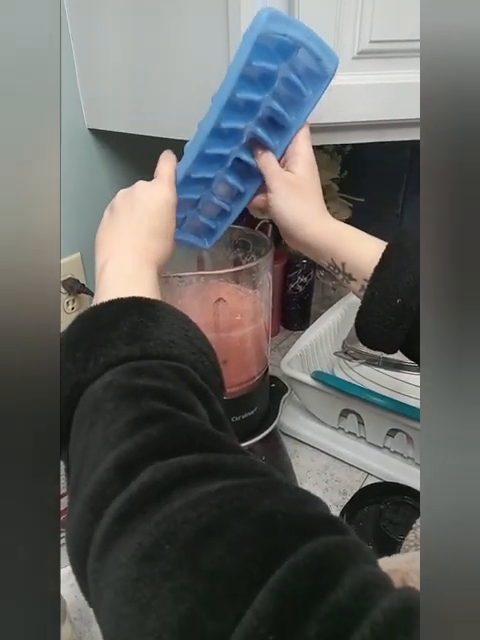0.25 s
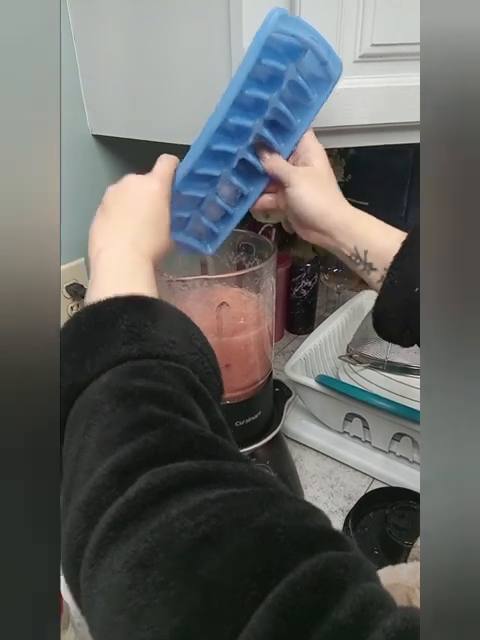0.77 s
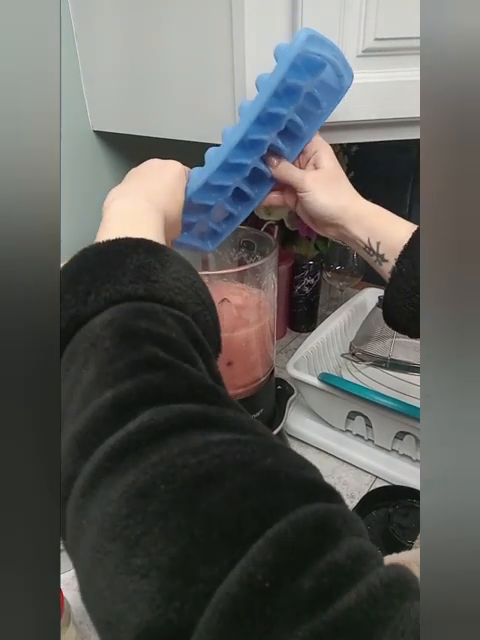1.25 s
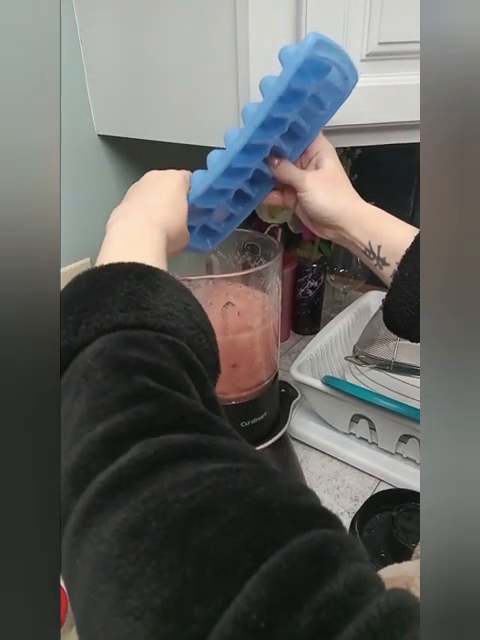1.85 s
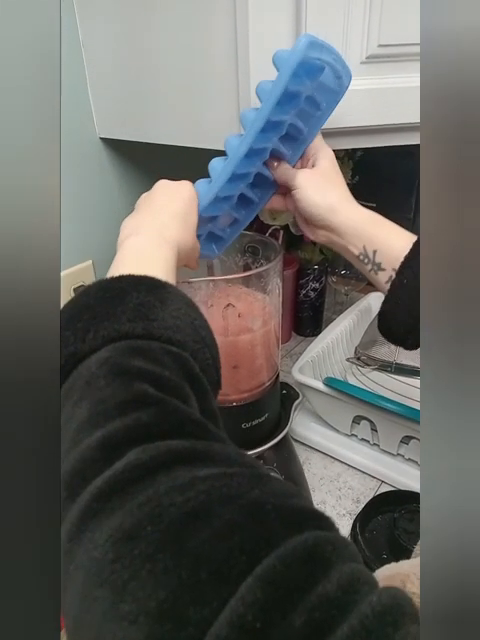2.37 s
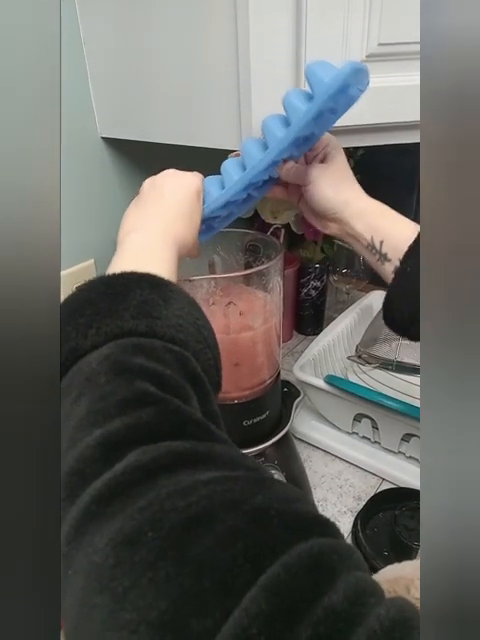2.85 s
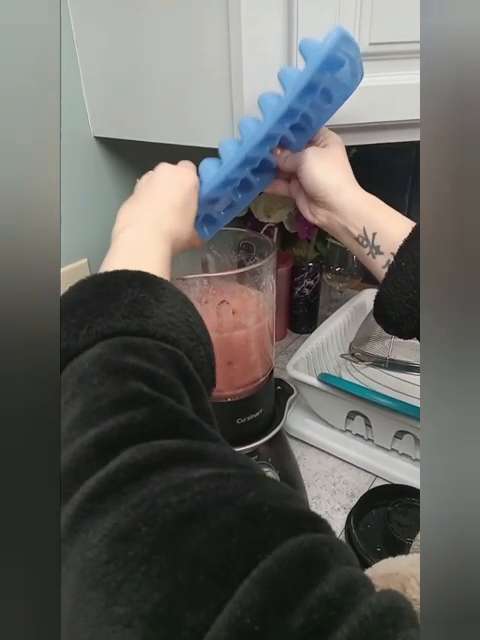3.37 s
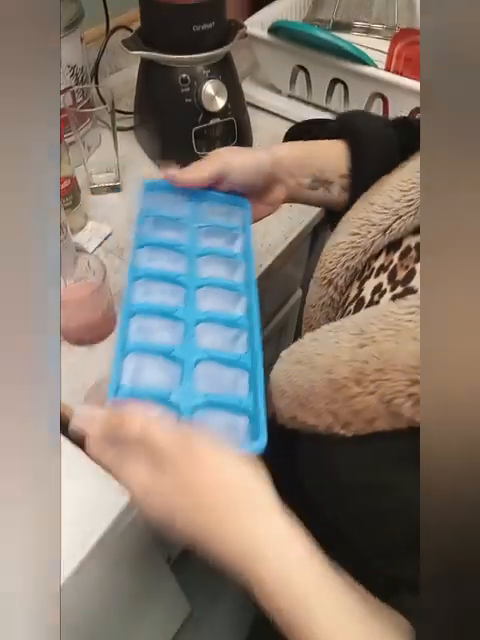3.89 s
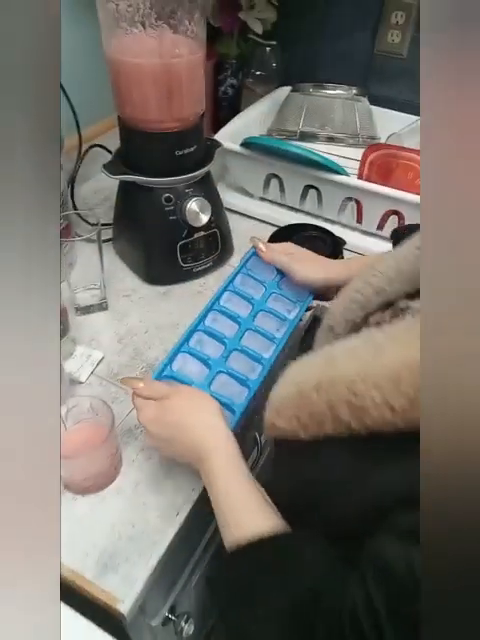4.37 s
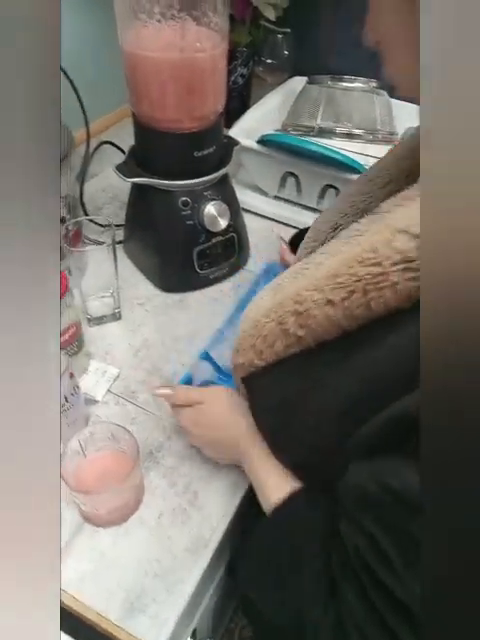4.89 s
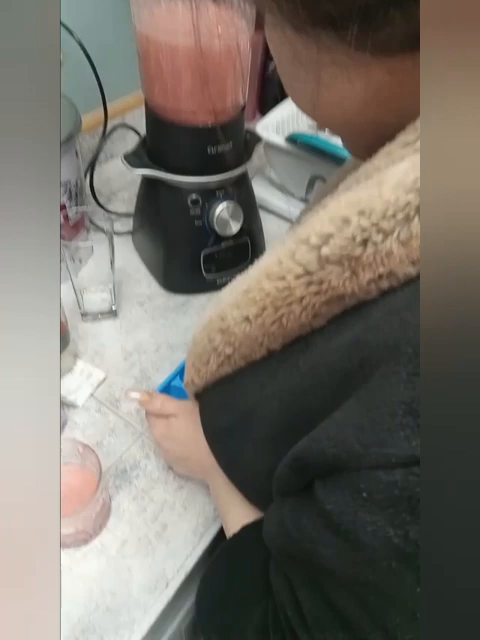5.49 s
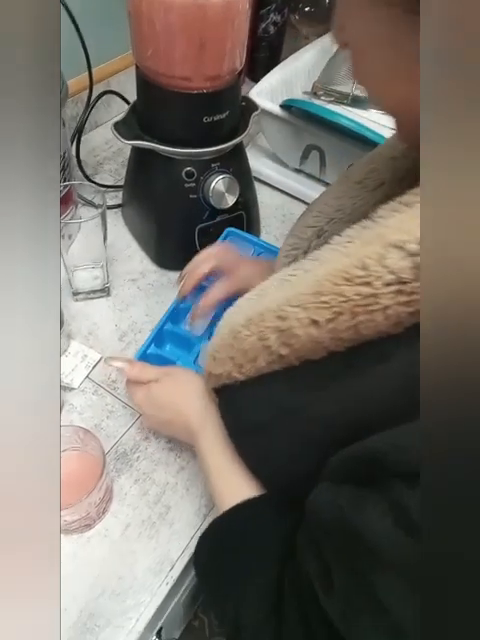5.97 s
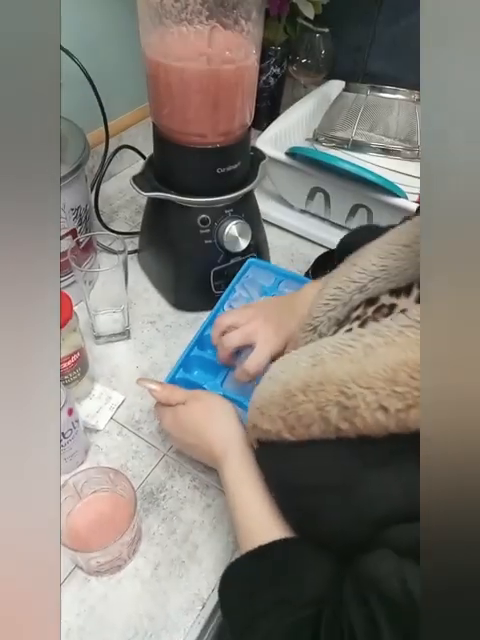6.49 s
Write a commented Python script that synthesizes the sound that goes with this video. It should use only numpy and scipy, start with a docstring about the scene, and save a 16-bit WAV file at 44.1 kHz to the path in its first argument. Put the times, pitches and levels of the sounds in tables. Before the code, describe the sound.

Ice cracks and crackles sharply as a plastic cube tray is twisted close up in a small kitchen, with one brief dead silence midway.

```python
"""In a small hard kitchen a plastic ice cube tray is bent and twisted, heard close up by two ports, the second facing away.
Ice snaps loose in short cracks (noise bursts through the tray plus ringing cups) and in runs of crackle
(dense grains of noise, with splinters that ping). Hands bump the tray as low decaying tones and fingers rub it
as a gliding narrow hiss; steady appliance noise and thin hums lie under all.
The sound stops dead for a moment before the tray is laid on the counter."""
import sys
import numpy as np
from scipy import signal
from scipy.io import wavfile
from scipy.ndimage import uniform_filter1d, minimum_filter1d

SR = 44100
rng = np.random.default_rng(int(sys.argv[2]) if len(sys.argv) > 2 else 0)


def int16_out(signal):
    """Quantize to a 16-bit WAV file."""
    q = np.round(np.clip(np.atleast_2d(signal).T, -1, 1) * 32767)
    wavfile.write(sys.argv[1], SR, q.astype(np.int16))


N = 297278  # length in samples

PAUSE = (3.718, 4.094)  # start and end of the silence, s
LAID_S = 4.62  # the tray comes to rest on the counter and takes its second colour


def amp(db):
    """Turn decibels into an amplitude factor."""
    return 10 ** (np.asarray(db) / 20)


def read(points, hz):
    """Read a curve of (Hz, value) points at the given frequencies, straight over log frequency."""
    f, value = np.transpose(points)
    return np.interp(np.log(hz + 1), np.log(f + 1), value)


def add(mix, s, sound):
    """Lay a sound into the mix at s seconds, cut at the end of the mix."""
    part = mix[..., round(s * SR):][..., :sound.shape[-1]]
    part += sound[..., :part.shape[-1]]


def air():
    """Steady appliance noise, its spectrum drifting in patches, with thin hums that waver in pitch."""
    # Kitchen floor as two curves, before and after the pause. Each row: frequency in Hz, relative level in dB.
    floor_curves = ([(18, -42), (30, -17), (245, -5), (900, -17), (1330, -18), (1500, -10), (1820, -12),
                     (2360, -7), (3380, -25.5), (4190, -19.5), (7440, -21.5), (9000, -47.5),
                     (11700, -70.5)], [(18, -52), (30, -23.5), (239, -9), (932, -18.5), (1160, -10),
                     (1500, -13), (1780, -11), (2250, -12), (2600, -9), (3230, -22.5), (6600, -16.5),
                     (9000, -52), (11700, -79), (19800, -120)])
    # Thin hums. Each row: start in seconds, end in seconds, centre pitch in Hz, level in dB RMS before the output gain.
    hum_rows = [(0, 3.72, 1484, -67.5), (0, 4.2, 2410, -74.5), (4.09, 6.74, 1178, -63.5)]
    floor_db = -60.5, -56.5  # RMS before and after the pause, ahead of the output gain

    frames, hz, t = N // 256 + 5, np.fft.rfftfreq(1024, 1 / SR), np.arange(N) / SR
    out = np.zeros(N)
    for curve, db, on in zip(floor_curves, floor_db, (t < PAUSE[1], t >= PAUSE[1])):
        real, imag, patches = rng.standard_normal((frames, 513, 3)).T
        patches = uniform_filter1d(patches, 8, axis=0)  # over frequency
        patches = uniform_filter1d(patches, 12, axis=1)  # over time
        patch_db = 2.0 * patches / patches.std()
        z = (real + 1j * imag) * amp(read(curve, hz)[:, None] + patch_db)
        noise = signal.istft(z, nperseg=1024, noverlap=768)[1][:N]
        out += on * amp(db) * noise / noise.std()
    for start, end, hum_hz, db in hum_rows:
        wander_hz = 300 * uniform_filter1d(rng.standard_normal(N), 2000)
        cycles = np.cumsum(hum_hz + wander_hz) / SR
        on = (t > start) & (t < end)
        out += np.sqrt(2) * amp(db) * on * np.sin(2 * np.pi * cycles)
    return out


def rub():
    """Fingers rub the plastic: noise in one narrow resonance that sinks in pitch and fades."""
    # Each row: start in seconds, length in seconds, relative level in dB, first pitch in Hz, last pitch in Hz.
    rub_rows = [(0, 0.5, -45.5, 2560, 2247), (1.84, 0.1, -58, 1200, 910), (1.95, .51, -51, 2024, 1826),
                (2.9, 0.33, -47, 2465, 2364)]
    fade_db = 14.5  # lost by the end of a rub

    out = np.zeros(N)
    for s, length, db, from_hz, to_hz in rub_rows:
        u = np.arange(0, length, 1 / SR) / length
        glide = np.exp(2j * np.pi * np.cumsum(from_hz + (to_hz - from_hz) * u) / SR)
        noise = rng.standard_normal(len(u)) + 1j * rng.standard_normal(len(u))
        slow = signal.lfilter(*signal.butter(2, 150, fs=SR), noise)  # becomes 150 Hz either side of the pitch
        level = np.minimum(u / .1, 1) * amp(db - fade_db * u ** 2)
        add(out, max(s, 0), level * (glide * slow).real / slow.real.std())
    return out


def bumps():
    """Hands on tray and counter: soft low rings that decay, and one sharp tap as a short pressure pulse."""
    # Dull bumps. Each row: start in seconds, relative level in dB, pitch in Hz, time to fall 60 dB in seconds.
    bump_rows = [(0.031, -50, 404, 0.13), (1.136, -39, 243, 0.11), (1.148, -52, 81.5, 0.13),
                 (1.17, -38, 115, 0.067), (1.412, -31, 276, 0.25), (1.413, -35, 90, 0.1),
                 (1.47, -37, 268, 0.2), (1.6, -47, 257, 0.11), (1.852, -41.5, 95, 0.11),
                 (1.849, -46, 216, 0.12), (1.87, -42.5, 361, 0.25), (1.909, -41, 331, 0.22),
                 (2.042, -40.5, 235, 0.12), (2.28, -48, 243.5, 0.14), (4.272, -32, 130, 0.042),
                 (4.547, -35, 132, 0.084), (5.439, -28, 150, 0.029), (5.798, -51.5, 138.8, 0.12),
                 (6.27, -45, 245, 0.19)]
    tap_s, tap_db, tap_width_s = 4.271, -13.5, 0.00039  # tap on the body that holds the ports

    out, t = np.zeros(N), np.arange(9000) / SR
    for s, db, hz, t60 in bump_rows:
        level = amp(db - 60 * t / t60) * (1 - np.exp(-t / 0.0055))
        add(out, s, level * np.sin(2 * np.pi * hz * t))
    u = t / tap_width_s
    add(out, tap_s, -amp(tap_db) * u * (2 - u) * np.exp(-u) * 2)
    return signal.lfilter(*signal.butter(2, 60, "high", fs=SR), out)


def ring(t, hz, t60, chance):
    """A struck cup: two close modes that beat as they die."""
    second_hz = hz * (1 + 0.11 * (chance[0] - .5))
    pair = np.sin(2 * np.pi * hz * t) + 0.39 * np.sin(2 * np.pi * (second_hz * t + chance[1]))
    return amp(-60 * t / t60) * pair


def cracks():
    """Ice tears loose: each crack sends a wide noise burst into the tray and rings a cup at three pitches."""
    # Single cracks. Each row: start in seconds, relative level in dB, cup ring in Hz, knock in Hz, bright ring in Hz,
    # knock over level in dB, snap over level in dB, base time to fall 60 dB in seconds (clamped below).
    crack_rows = [(0.0503, -42.5, 2580, 479, 4150, -14.5, -35, 0.033),
                  (0.0992, -28, 1520, 1080, 6550, -17, 9.5, 0.021),
                  (0.2284, -24, 2520, 1023, 7630, -14, 5, 0.018),
                  (0.3237, -29, 3200, 662, 6420, -4, 7, 0.04),
                  (0.4479, -55, 2290, 1070, 6160, -26, 5, 0.043),
                  (0.6015, -43, 2780, 842, 6570, -33, 16, 0.038),
                  (0.6274, -50, 2770, 820, 6330, -27, 17, 0.033),
                  (0.6669, -37.5, 3520, 888, 6030, -29, 15.5, 0.027),
                  (0.9584, -23.5, 3100, 630, 6450, -24, 5, 0.034),
                  (1.0011, -18, 2160, 1010, 7430, -27, -2, 0.038),
                  (1.0335, -17.5, 2960, 630, 4370, -32.5, -3, 0.035),
                  (1.0994, -14, 2580, 1058, 4550, -16, -6, 0.028),
                  (1.1258, -19, 1630, 1050, 4650, -3.5, -2.5, 0.025),
                  (1.1403, -13.5, 2450, 970, 7230, -15.5, -6.5, 0.022),
                  (1.1724, -19, 2600, 746, 4570, -18, -6, 0.029),
                  (1.2411, -12, 2180, 913, 4430, -22, -4, 0.022),
                  (1.2984, -13.5, 2270, 843, 4650, -21.5, -10, 0.039),
                  (1.3523, -17.5, 3130, 580, 4170, -26, -8, 0.036),
                  (1.3957, -11, 3010, 692, 4720, -12.5, -24, 0.026),
                  (1.4232, -17, 2676, 900, 3860, -18.5, -29, 0.032),
                  (1.4755, -28, 2660, 774, 4440, -9.5, -16, 0.036),
                  (1.6053, -19.5, 2633, 733, 3880, -37, -27, 0.041),
                  (1.7095, -48, 1980, 664, 6400, -19, -9, 0.076),
                  (1.7264, -45.5, 3340, 767, 6300, -25, 16, 0.026),
                  (1.7414, -35.5, 2440, 1100, 6180, -41, 11, 0.041),
                  (1.7654, -35, 2190, 778, 6400, -38, 4.5, 0.034),
                  (1.8282, -18, 2330, 1090, 4080, -45, -1, 0.022),
                  (1.9614, -25.5, 1640, 622, 4930, -18, -43, 0.048),
                  (2.166, -46.5, 1600, 1090, 6100, -32, -2.5, 0.092),
                  (2.1904, -19.5, 2830, 646, 6600, -42, -1.5, 0.018),
                  (2.2368, -21.5, 2090, 640, 4200, -32.5, -14, 0.044),
                  (2.3984, -38, 1576, 890, 4350, -27, -14, 0.044),
                  (2.4663, -20.5, 2214, 633, 4030, -11, -46, 0.039),
                  (2.6234, -57, 1480, 540, 6390, -12, 5, 0.033),
                  (2.6773, -17.5, 2790, 1050, 4400, -58, -20.5, 0.016),
                  (2.7134, -43.5, 2350, 550, 6200, -12, 14.5, 0.017),
                  (2.7397, -21.5, 2570, 658, 6230, -12.5, -9, 0.036),
                  (2.7641, -20.5, 3050, 627, 6500, -28, -6.5, 0.036),
                  (2.8444, -24, 2200, 640, 4300, -30, -30, 0.024),
                  (2.8818, -17, 2300, 620, 6440, -32, -18, 0.027),
                  (2.8983, -12, 2740, 611, 4380, -45, -6.5, 0.022),
                  (3.0654, -14.5, 2522, 644, 6470, -36, -6, 0.033),
                  (3.3574, -54, 1480, 830, 5850, -23, 12.5, 0.036),
                  (3.3837, -27.5, 2850, 834, 3770, -49, -12.5, 0.04),
                  (3.4356, -25, 1670, 622, 6500, -15.5, -12, 0.031),
                  (3.5224, -16.5, 1777, 783, 4350, -38, -10.5, 0.041),
                  (3.5867, -14, 2710, 888, 6100, -34.5, -5.5, 0.029),
                  (3.6551, -18, 2363, 648, 5800, -26, -19, 0.036),
                  (3.71, -25, 2470, 1010, 7250, -32, 9, 0.021),
                  (4.0991, -46, 3394, 711, 5990, -14.5, -9.5, 0.037),
                  (4.1714, -39.5, 3150, 770, 4630, -19, -8, 0.067),
                  (4.2532, -41, 1740, 460, 4800, -15, -17, 0.033),
                  (4.2944, -29, 3440, 1090, 7170, -16, 0, 0.061),
                  (4.4174, -38, 2280, 993, 6960, -21, 1, 0.044),
                  (4.4404, -28.5, 2655, 960, 6970, -23.5, 7, 0.057),
                  (4.4862, -28, 1880, 826, 6460, -34, 10, 0.015),
                  (4.5324, -26.5, 1380, 1080, 7100, -14.5, 3.5, 0.038),
                  (4.6314, -22.5, 2380, 1030, 5700, -25, -3.5, 0.038),
                  (4.6654, -35.5, 3130, 899, 6030, -22, 9, 0.055),
                  (4.7097, -34, 3450, 452, 5930, -25, 7, 0.039),
                  (4.7364, -32, 2680, 990, 5660, -36, 6.5, 0.029),
                  (4.7541, -20.5, 3010, 630, 6380, -28, 2.5, 0.029),
                  (4.81, -6, 2110, 1090, 5800, -38, -10, 0.033),
                  (4.8514, -9.5, 1980, 792, 6380, -21, -5.5, 0.05),
                  (4.8723, -9, 1576, 600, 4810, -19.5, -25, 0.098),
                  (4.9187, -11, 2120, 1100, 4040, -21, -7, 0.03),
                  (4.9596, -12.5, 2970, 1110, 4100, -15, -17, 0.03),
                  (5.1153, -16.5, 2230, 733, 5200, -24, -11, 0.042),
                  (5.1734, -28.5, 2300, 910, 5520, -30, 7, 0.041),
                  (5.1971, -15.5, 3220, 1150, 5150, -21, 0, 0.021),
                  (5.2126, -13, 2080, 674, 5300, -29, -7, 0.025),
                  (5.2694, -23, 1620, 800, 5030, -19, -4, 0.036),
                  (5.2879, -12, 1860, 566, 4940, -15.5, -5, 0.052),
                  (5.3557, -9.5, 1730, 920, 5480, -23, -26, 0.026),
                  (5.3737, -8.5, 2104, 577, 4730, -19.5, -35, 0.035),
                  (5.3991, -19, 2300, 753, 5530, -16, -10, 0.033),
                  (5.4684, -23.5, 1930, 534, 5930, -9, 4.5, 0.036),
                  (5.5049, -19, 1610, 844, 5230, -8, -4, 0.028),
                  (5.5408, -18.5, 1810, 773, 5900, -5.5, -9, 0.037),
                  (5.5797, -16.5, 2265, 984, 5680, -21, -6.5, 0.046),
                  (5.6174, -25, 2230, 750, 4380, -17, 4.5, 0.032),
                  (5.6675, -16, 1310, 1120, 4200, -12, -26, 0.024),
                  (5.7674, -34, 2245, 848, 6220, -33, -7, 0.045),
                  (6.0536, -15.5, 2070, 1020, 4610, -28, -4.5, 0.032),
                  (6.0786, -13, 2710, 1070, 4170, -29, -5.5, 0.021),
                  (6.1064, -23.5, 2940, 1050, 4720, -32, 8, 0.043),
                  (6.1534, -16, 2860, 1055, 4550, -16, -8.5, 0.032),
                  (6.1854, -20.5, 2910, 940, 4730, -23, -1, 0.042),
                  (6.2238, -24, 3050, 700, 5700, -35, 1.5, 0.033),
                  (6.3021, -16.5, 2370, 1100, 4320, -25, -20, 0.027),
                  (6.33, -20, 2160, 1120, 4470, -20.5, -7, 0.045),
                  (6.3659, -18, 2890, 1073, 4050, -16.5, 0, 0.038),
                  (6.4283, -29.5, 3130, 900, 6200, -16, 10, 0.02),
                  (6.4512, -26, 2230, 1130, 4680, -23, 1.5, 0.033),
                  (6.4961, -29.5, 2780, 1110, 6130, -33, 7, 0.033),
                  (6.5794, -23, 2030, 1100, 5880, -43, 0, 0.038),
                  (6.6273, -18.5, 2445, 880, 5000, -54, -7.5, 0.05)]
    fizz_db, fizz_per_snap = (-28, -42), 2  # top fizz follows the snap: cracks before, after the pause starts

    drive, rings, t = np.zeros((4, N)), np.zeros(N), np.arange(4000) / SR
    noises = rng.standard_normal((len(crack_rows), 4, 4000))
    chances = rng.random((len(crack_rows), 3, 2))
    for row, noise, chance in zip(crack_rows, noises, chances):
        s, db, cup_hz, knock_hz, bright_hz, knock_db, snap_db, t60 = row
        t60 = np.clip(t60, .01, .07)
        top_db = fizz_db[int(s > PAUSE[0])] + fizz_per_snap * snap_db
        size = amp(db + np.array([knock_db, 0, snap_db, top_db]))[:, None]  # hollow, body, snap, fizz
        tearing = amp(-60 * t / t60) * (1 - np.exp(-t / (0.053 * t60)))
        add(drive, s, amp([[-6], [-2], [5], [0.1]]) * size * tearing * noise)

        modes = zip((knock_hz, cup_hz, bright_hz), t60 * np.array([2.2, .9, .7]), chance)
        cups = [ring(t, *mode) for mode in modes]
        onset = np.sin(np.pi / 2 * np.minimum(t / (0.054 * t60), 1)) ** 2
        add(rings, s, (amp([[2.5], [.5], [2.5]]) * size[:3] * cups).sum(0) * onset)
    return drive, rings


def strain():
    """Level of the four tray bands as the tray is strained: each run swells, then dies, the treble first."""
    # Runs of crackle. Each row: start in seconds, swell in seconds, dying in seconds, relative level in dB,
    # hollow over level in dB, snap over level in dB.
    run_rows = [(0.102, 0.0033, 0.15, -36.5, -21, -4.5), (0.224, 0.0019, 0.21, -41, -8.5, 1),
                (0.322, 0.0019, .12, -45, -1, 11), (.6, .01, 0.11, -67, -25, 12),
                (0.666, .003, 0.13, -57.5, -22, 18), (.96, 0.015, 0.41, -30.5, -29, 0),
                (1.1, .004, .06, -40, -15, 0), (1.14, 0.039, 0.063, -32, -6.5, -2),
                (1.243, 0.0065, 0.3, -26.5, -14, -1), (1.397, 0.0037, 0.16, -32.5, -4.5, -12),
                (1.47, 0.022, 0.07, -48.5, -15.5, 5.5), (1.725, 0.0054, 0.14, -48, -35, 7),
                (1.824, 0.0016, 0.15, -44, -30, 4), (2.192, 0.0044, 0.11, -35, -26, 9),
                (2.236, 0.01, 0.077, -36.5, -29, -17), (2.716, 0.034, .2, -33.5, -32, 1),
                (2.88, .04, 0.22, -38, -43, -8.5), (3.067, 0.0058, 0.18, -34, -26, -2.5),
                (3.526, 0.0028, 0.2, -32.5, -24, -11), (3.585, .004, 0.33, -40.5, -27, -1),
                (3.655, .01, .3, -44, -11, -4), (4.095, .004, 0.91, -48, -9.5, -2.5),
                (4.242, 0.088, 0.25, -32, -22, 10), (4.328, 0.051, 0.03, -29.5, -31, 9),
                (4.389, 0.081, 0.26, -33.5, -15.5, 4), (4.628, 0.0044, 0.085, -31, -28, 4),
                (4.73, .04, 0.67, -33, -26, 11.5), (4.802, 0.073, 0.13, -18, -10, -3),
                (4.931, 0.085, 0.032, -19.5, -13.5, 5.5), (5.02, 0.076, 0.19, -29, -14, -2.5),
                (5.16, 0.076, 0.17, -33, -25, 8.5), (5.262, 0.059, 0.055, -14, -10.5, -6),
                (5.332, .1, 0.17, -24, -9, 3), (5.498, 0.037, 0.18, -23, -5.5, -3),
                (5.64, 0.022, 0.081, -29.5, -10, -12), (5.72, 0.029, 0.21, -52.5, -9, 3),
                (6.053, 0.0024, 0.29, -29, -19, 2), (6.148, 0.0045, 0.083, -23.5, -16.5, -3),
                (6.169, 0.041, 0.17, -29.5, -16.5, 2), (6.301, 0.012, 0.34, -31, -22, 0),
                (6.399, 0.12, 0.15, -32.5, -46, 0), (6.617, .016, 0.032, -28, -45, -10),
                (6.698, 0.032, 0.076, -46, -33, -2)]
    swell_db, dying_db = 14.5, 35.5  # body band: climb over the swell, fall over the dying time
    band_speed = .8, 1, 1.3, 2  # hollow, body, snap and fizz move at these multiples of that
    dying_bend = 1.18  # above 1: a run holds at first and then drops away
    fizz_db, fizz_per_snap = (-22, -31.5), 1.4  # runs before and after the pause starts

    power, t = np.zeros((4, N)), np.arange(SR // 2) / SR
    for s, swell, dying, db, hollow_db, snap_db in run_rows:
        swell, dying = max(swell, .001), max(dying, .01)
        rising = swell_db * (1 - t / swell)
        falling = dying_db * (abs(t - swell) / dying) ** dying_bend
        under_db = np.where(t < swell, rising, falling)
        run_fizz_db = fizz_db[int(s > PAUSE[0])] + fizz_per_snap * min(snap_db, 8.5)
        top_db = db + np.array([hollow_db, 0, snap_db, run_fizz_db])
        add(power, s, amp(top_db[:, None] - np.outer(band_speed, under_db)) ** 2)
    return np.sqrt(power)


def crackle():
    """Many tiny fractures of very unequal size over the steady rub of plastic on ice, as noise in four bands."""
    hit = rng.exponential(1, N)
    size = amp(3.0 * np.minimum(hit, 3)) * (rng.random(N) < 450 / SR)  # about 450 fractures per second
    share = amp(3.9 * rng.standard_normal((4, N)))  # each fracture has its own colour
    decay = amp(-60 * np.arange(1200) / SR / 0.043)
    grain = 2.8 + signal.oaconvolve(size * share, decay[None], axes=1)[:, :N]  # 2.8 is the rub
    grain /= np.sqrt(np.mean(grain ** 2, axis=1, keepdims=True))
    return uniform_filter1d(strain(), 100, axis=1) * grain * rng.standard_normal((4, N))


def chips():
    """Splinters of ice tick against the cup walls during a run, each a short ping at one of twelve pitches."""
    chips_per_s, ring_cycles, level_db = 160, 51, -5  # a ping falls 60 dB in this many cycles
    ranges_hz = (1400, 3200), (3900, 7000)  # body chips, snap chips

    out, t = np.zeros(N), np.arange(1500) / SR
    for level, (lo_hz, hi_hz) in zip(strain()[1:3], ranges_hz):
        hit = rng.exponential(1, N)
        size = amp(4.0 * np.minimum(hit, 3)) * (rng.random(N) < chips_per_s / SR)
        pick, pings = rng.integers(0, 12, N), np.zeros(N)
        for k, hz in enumerate(np.geomspace(lo_hz, hi_hz, 12)):
            envelope = amp(-60 * t * hz / ring_cycles) * np.minimum(t * hz / 6, 1) ** 2
            ping = envelope * np.sin(2 * np.pi * hz * t)
            struck = signal.oaconvolve(size * level * (pick == k), ping)[:N]
            pings += struck / np.sqrt(np.mean(size ** 2) * (ping ** 2).sum())
        out += pings
    return amp(level_db) * out


def causal(gain_db):
    """Minimum-phase taps, which speak at once, for a gain given on the half circle."""
    log_gain = np.maximum(gain_db, -100) * np.log(10) / 20
    whole = signal.hilbert(np.r_[log_gain, log_gain[-2:0:-1]])
    return np.fft.ifft(np.exp(np.conj(whole))).real[:2048]


def tray_bands(spectrum):
    """The tray's response split in hollow, body, snap and fizz parts, each of energy 1."""
    # Tray resonances. Each row: frequency in Hz, width in Hz, height in dB (added to a flat gain of 1).
    resonances = [(600, 50, -12), (1700, 310, -4), (2500, 220, -14.5), (4290, 970, -2), (6200, 130, -17.5)]

    hz = np.fft.rfftfreq(8192, 1 / SR)
    peaks = sum(amp(db) / (1 + (2 * (hz - f) / width) ** 2) for f, width, db in resonances)
    whole_db = read(spectrum, hz) + 20 * np.log10(1 + peaks)
    edges = [150, 1200, 3500, 9500, 20000]  # Hz
    taps = []
    for lo, hi in zip(edges, edges[1:]):
        skirt = (1 + (lo / (hz + 1)) ** 10) * (1 + (hz / hi) ** 10)
        taps.append(causal(whole_db - 10 * np.log10(skirt)))
    return [h / np.linalg.norm(h) for h in taps]


def through_tray(drive):
    """The plastic colours the four noise bands, one way held up and another way lying on the counter."""
    # Two curves, tray held up and tray on the counter. Each row: frequency in Hz, relative level in dB.
    tray_curves = ([(150, -49.5), (250, -17), (278, -24.5), (381, -34.5), (644, -12), (1020, -24),
                    (1230, -13.5), (2480, 0.5), (3650, -5.5), (6400, 5), (7630, -0.5), (9090, -26),
                    (15400, -31), (16500, -46.5)], [(120, -70), (200, -36.5), (375, -21.5), (513, -17.5),
                    (584, -11.5), (1030, -13.5), (1700, -7.5), (2860, -3.5), (3500, -9), (5980, -0.5),
                    (8650, -37.5), (13200, -44), (15300, -40), (16500, -68)])
    laid = np.arange(N) / SR > LAID_S
    out = np.zeros(N)
    for on, curve in zip((~laid, laid), tray_curves):
        for band, taps in zip(drive, tray_bands(curve)):
            out += signal.oaconvolve(band * on, taps)[:N]
    return out


def tail():
    """Kitchen echoes: sparse taps of random sign, each band dying at its own speed; energy 1."""
    # Decay of the room. Each row: frequency in Hz, time to fall 60 dB in seconds.
    room_decay = [(300, 0.095), (800, 0.083), (2100, 0.21), (5500, 0.16), (12000, 0.1)]
    taps = np.zeros(SR // 2)
    at = np.arange(300, SR // 2 - 20, 20)
    taps[at + rng.integers(0, 20, len(at))] = rng.choice([-1., 1.], len(at))
    hz, t, z = signal.stft(taps, SR, nperseg=128)
    fading = z * amp(-60 * t / read(room_decay, hz)[:, None])
    h = signal.istft(fading, SR, nperseg=128)[1]
    return h / np.linalg.norm(h)


def rear_port(front):
    """The rear port hears part of the wave a little earlier; random phases make the rest unlike the front, so wide."""
    # Front port over rear port. Each row: frequency in Hz, difference in dB.
    front_over_rear = [(60, 19), (110, -0.5), (200, 8), (380, 16.5), (700, 3), (1290, 14.5), (2380, 19.5),
                       (4400, 14), (8120, 11), (15000, -13)]
    # Likeness of the two ports. Each row: frequency in Hz, share from 0 (all random phase) to 1 (same).
    likeness = [(100, 1), (500, 0.82), (1000, 0.2), (3000, .45), (10000, 0.05)]
    lead_before, lead_after = 49, 40  # samples, before and after the end of the pause

    before = np.arange(N) / SR < PAUSE[1]
    early = np.where(before, np.roll(front, -lead_before), np.roll(front, -lead_after))
    hz, _, z = signal.stft(early, SR, nperseg=256, noverlap=192)
    same = np.clip(read(likeness, hz), 0, 1)[:, None]
    random_phase = np.exp(2j * np.pi * rng.random(z.shape))
    z = z * (same + 2 * np.sqrt(1 - same ** 2) * random_phase)
    z = z * amp(-read(front_over_rear, hz))[:, None]
    return signal.istft(z, SR, nperseg=256, noverlap=192)[1][:N]


def scene():
    """Sum tray, hands, room echoes and air at the front port, then derive the rear port."""
    drive, rings = cracks()
    tray = rings + through_tray(drive + crackle())
    near = tray + chips() + bumps() + rub()
    echoes = amp(-12) * signal.oaconvolve(near, tail())[:N]
    front = near + echoes + air()
    return amp(3.0) * np.array([front, rear_port(front)])  # left, right


def record(dry):
    """A quick limiter holds the loudest crunch; then the silent pause and a low-pass."""
    t = np.arange(N) / SR
    peak = -minimum_filter1d(-abs(dry).max(0), size=400)
    held = dry / uniform_filter1d(np.maximum(peak / .9, 1), size=300)
    on = uniform_filter1d(1. * ((t < PAUSE[0]) | (t > PAUSE[1])), 60)
    low_pass = signal.firwin(511, 16300, window=("kaiser", 9), fs=SR)
    return signal.oaconvolve(on * held, low_pass[None], "same")


dry = scene()
out = record(dry)
int16_out(out)
```